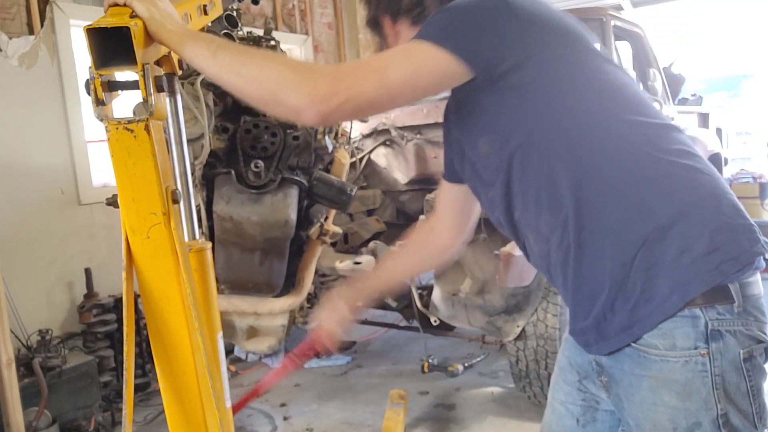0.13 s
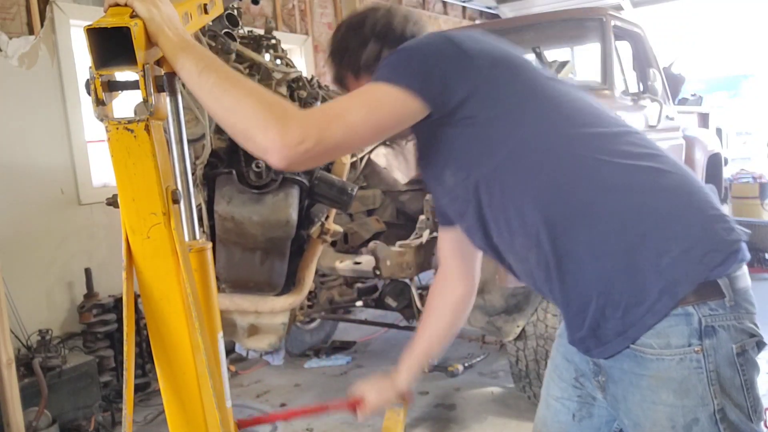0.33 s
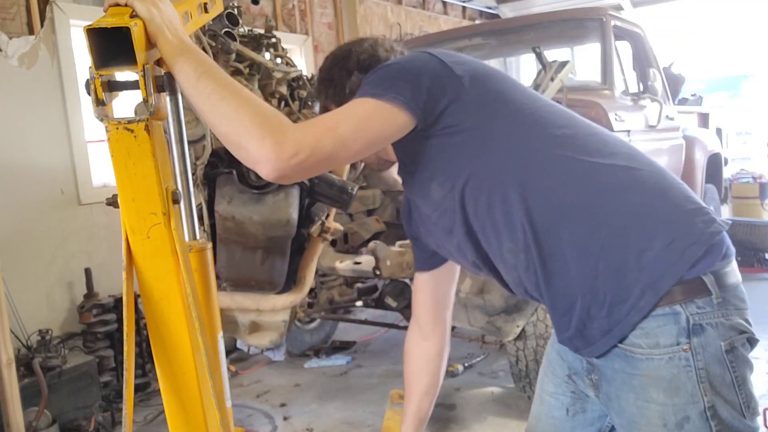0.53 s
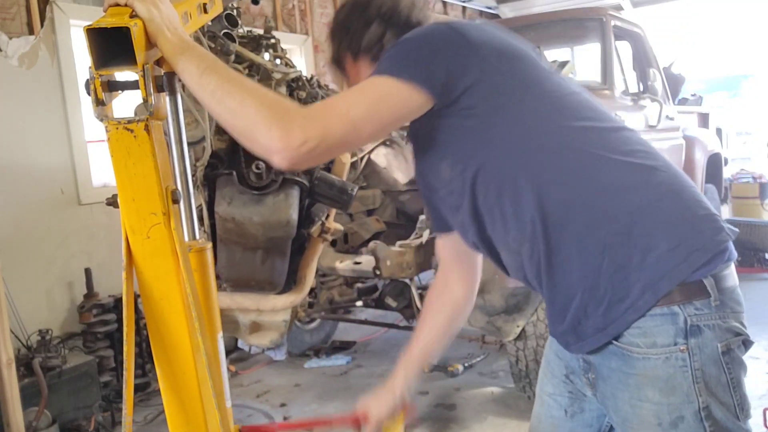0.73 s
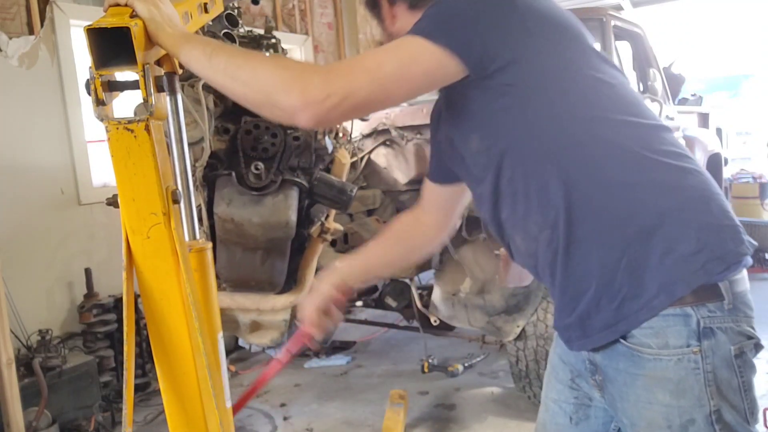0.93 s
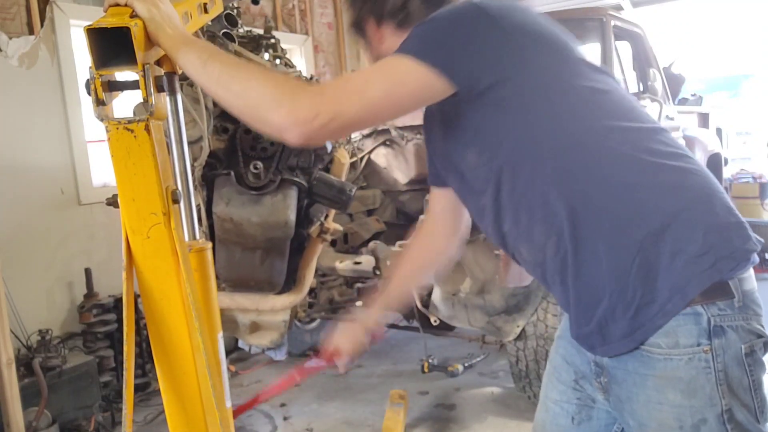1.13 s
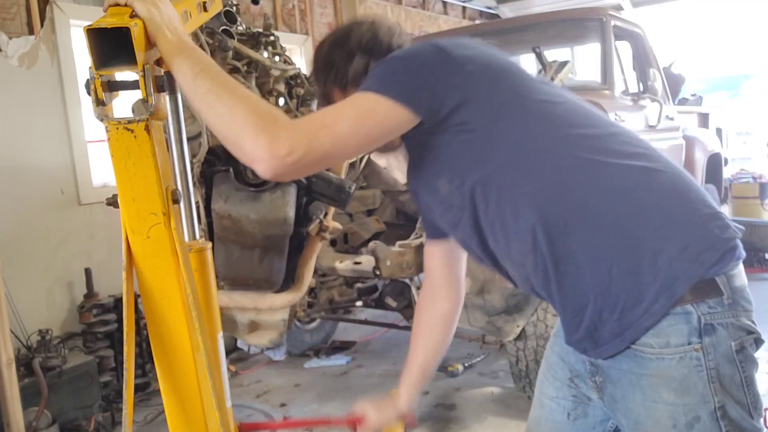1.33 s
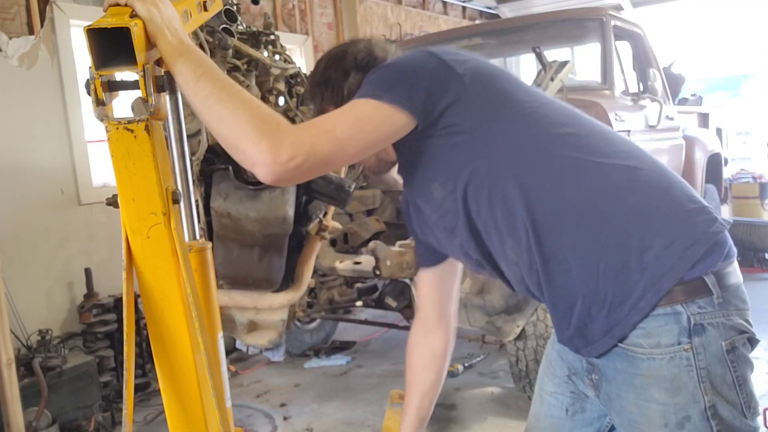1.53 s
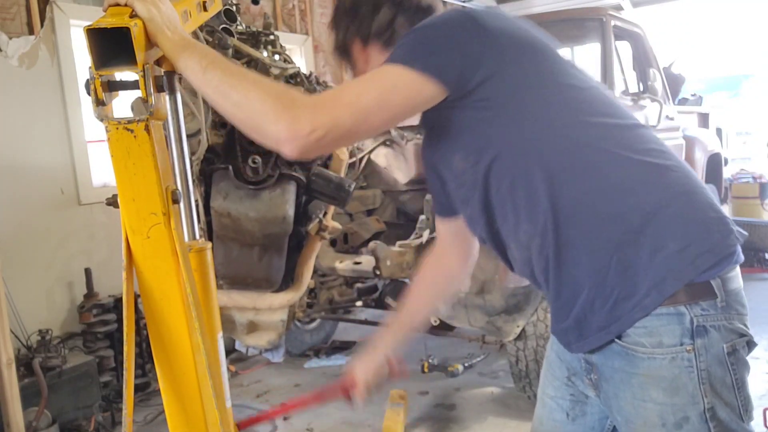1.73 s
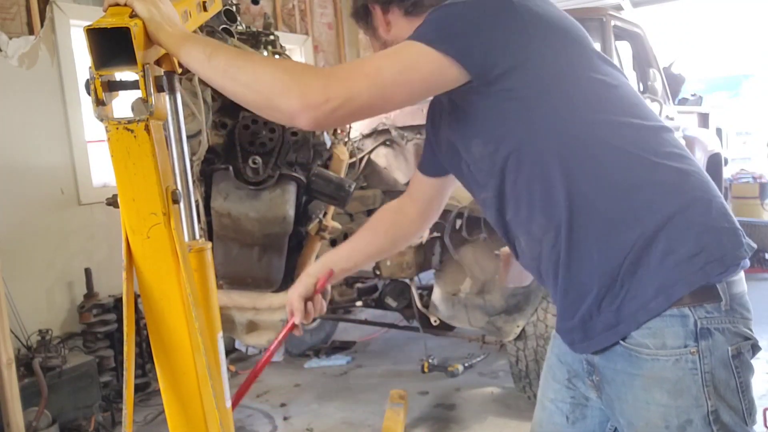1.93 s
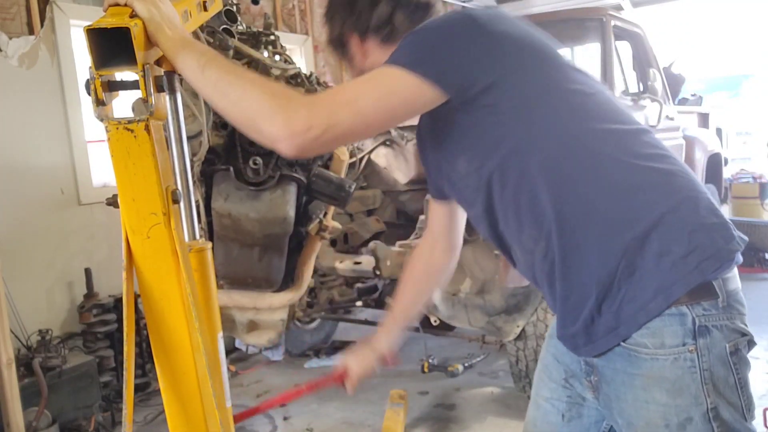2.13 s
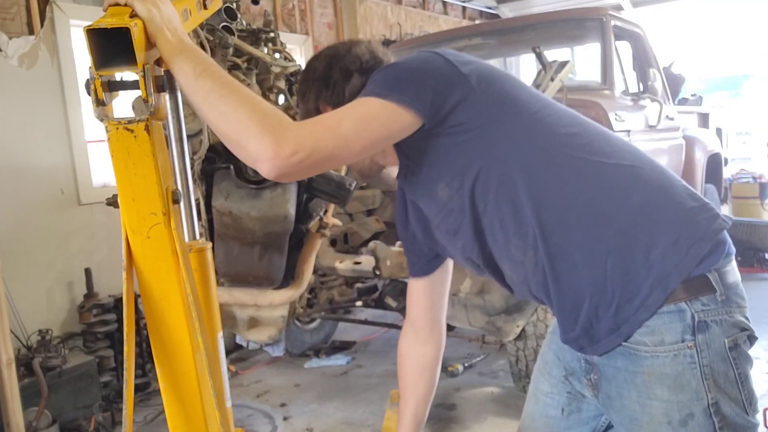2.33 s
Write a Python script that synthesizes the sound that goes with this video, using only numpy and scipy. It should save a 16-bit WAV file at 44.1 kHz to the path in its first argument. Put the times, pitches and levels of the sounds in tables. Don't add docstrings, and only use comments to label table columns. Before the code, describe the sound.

A steel hydraulic hoist clanks and rattles sharply on three hand-pumped strokes in a garage

```python
import sys
import numpy as np
from scipy import signal
from scipy.fft import rfft, irfft
from scipy.io import wavfile
from scipy.ndimage import uniform_filter1d

SR = 44100
rng = np.random.default_rng(int(sys.argv[2]) if len(sys.argv) > 2 else 0)


def int16_out(signal):
    q = np.round(np.clip(np.atleast_2d(signal).T, -1, 1) * 32767)
    wavfile.write(sys.argv[1], SR, q.astype(np.int16))


def gain_from_db(level_db):
    decades = np.asarray(level_db, float) / 20
    return 10 ** decades


N = 110250
T = np.arange(N) / SR

CHATTER_START_S = [.203, .2245, 1.125, 1.138, 1.162, 1.177, 2.075, 2.100, 2.117]
CHATTER_SWELL_DB = [0, 0, -3.5, 20, -5, -2, 21.5, 7, 0]
# length in seconds, drive of frame, cylinder, pins and spring in dB.
CHATTER = [
    (0.027, -45, -37, -42, -43),
    (0.035, -46.5, -32, -41.5, -48.5),
    (.02, -65.5, -87.5, -100, -97.5),
    (0.02, -49, -56.5, -51.5, -60),
    (0.013, -46, -49.5, -47, -45),
    (0.0302, -40.5, -48, -50.5, -55.5),
    (0.027, -50, -59, -62, -60),
    (0.0161, -41, -47, -51, -46.5),
    (0.035, -42, -35.5, -40.5, -49.5),
]
# peak in seconds, rise in seconds, fall in seconds, frame level in dB, seal level in dB.
RUBS = [
    (0.055, 0.0053, 0.034, -69, -62.5),
    (0.123, 0.0059, 0.015, -74, -61),
    (0.186, 0.011, 0.049, -87, -59.5),
    (0.682, 0.029, 0.015, -63, -78.5),
    (0.728, 0.022, 0.022, -64.5, -65),
    (0.799, 0.013, 0.026, -79.5, -78),
    (1.5, 0.024, 0.03, -71.5, -75),
    (1.629, 0.023, 0.02, -58.5, -70),
    (1.727, 0.03, 0.016, -62.5, -56.5),
    (1.808, 0.039, 0.034, -66, -67),
]
# frequency in Hz, level in dB, T60 in seconds.
FRAME_MODES = [(340, -1, .05), (385, -2, .06), (510, -8, .05), (700, -7, .06), (785, -7, .07),
               (1022, 0, .05), (1066, -1, .06)]
CYLINDER_MODES = [(1380, -8, .04), (1750, -2, .04), (1850, -3, .04), (1960, -8, .04), (2290, -5, .04),
                  (2550, 0, .04), (2680, -2, .03), (2860, -1, .03), (3350, -6, .04)]
PIN_MODES = [(4460, -1, .02), (5930, -3, .02), (6720, 0, .015), (7400, -4, .015)]
SEAL_MODES = [(1050, -8, .03), (2550, -2, .04), (3520, -5, .025), (4900, -10, .01), (8100, -9, .01),
              (10800, -14, .008), (12400, -16, .008), (13800, -14, .008)]
# frequency in Hz, density in dB per Hz.
FRAME_FIZZ = [(120, -45), (270, -26), (340, 0), (1000, 0), (1700, -5), (2300, -14), (5000, -30)]
CYLINDER_FIZZ = [(600, -30), (1350, -14), (1750, -2), (2600, 0), (3200, -6), (4000, -13), (9000, -30)]
PIN_FIZZ = [(1500, -21.5), (3500, -5.5), (4500, -1), (5500, -9), (7000, -1.5), (8000, -7.5), (10000, -27)]
SEAL_FIZZ = [(500, -2.5), (2000, 4.5), (3400, -1.5), (4000, 0.5), (7000, -6), (10000, -8.5), (16000, -17.5)]
SPRING_FIZZ = [(6000, -25.5), (8500, 1), (10000, -7), (11500, -3.5), (13700, -2), (16000, -3)]
# start in seconds, boom, ram and collar levels in dB.
BLOWS = [
    (.226, -28, -0.5, -8),
    (1.165, -14, -5, -27),
    (2.118, -9.5, -1, -6),
]
# frequency in Hz, level in dB, T60 in seconds.
BOOM_MODES = [(125, -20, .35), (165, -18, .35), (235, -14, .3), (330, 0, .25), (388, 0, .3),
              (508, -10, .15), (840, -5, .18), (895, -7, .25), (1093, -7, .2)]
RAM_MODES = [(1583, -8, .58), (1678, -2, .42), (1747, -3, .27), (1846, -6, .5)]
COLLAR_MODES = [(2290, -5, .33), (2549, 2, .46), (2686, -5, .32), (2740, -9, .2), (2866, -5, .18),
                (3365, -7, .38)]
# start in seconds, hold in seconds, frequency in Hz. Then their levels in dB.
SINGING = [(.212, .05, 340), (.225, .04, 385), (.228, .035, 1022), (.228, .035, 1066), (.215, .025, 1850),
           (.232, .03, 1750), (.228, .03, 2550), (.24, .025, 2690), (1.17, .045, 335), (1.17, .04, 385),
           (1.18, .04, 840), (1.165, .05, 1022), (1.17, .045, 1066), (1.136, .02, 13750),
           (1.163, .008, 13750), (2.112, .045, 340), (2.115, .045, 385), (2.115, .04, 710),
           (2.12, .04, 1022), (2.12, .04, 1066), (2.118, .03, 2570), (2.135, .025, 2830), (2.13, .03, 1680),
           (1.71, .04, 2550), (1.72, .03, 1060), (1.72, .03, 510)]
SINGING_DB = [-47.5, -46, -40.5, -43, -31.5, -28, -36, -36, -44, -41.5, -39.5, -41, -38.5, -52, -42, -40.5,
              -40, -43, -40, -36.5, -34, -47, -31, -61.5, -54, -61]
# start in seconds, level in dB, centre in Hz, width in Hz, T60 in seconds.
TICKS = [(0.1978, -33, 12000, 5000, .02), (.204, -19, 11340, 1500, 0.026), (0.2115, -19, 14600, 2000, .012),
         (.2118, -23, 11700, 1500, .02), (0.2245, -15, 1820, 1200, 0.033), (.2254, -9.5, 6600, 3500, 0.017),
         (0.2338, -7.5, 2980, 3030, 0.009), (.2335, -20.5, 7100, 2020, 0.011),
         (0.2435, -11, 2200, 2504, 0.014), (0.2532, -17, 2770, 1491, .015), (0.2603, -16, 2850, 1500, .015),
         (1.003, -48.5, 700, 895, .04), (.628, -54, 705.5, 695, 0.042), (1.143, -43, 6275, 1000, 0.038),
         (1.1626, -23.5, 6300, 1470, .015), (1.174, -20.5, 4670, 594, 0.035),
         (1.178, -13.5, 1030, 1200, 0.025), (1.187, -16.5, 1220, 2000, 0.0056),
         (1.2065, -20, 982, 1500, .015), (1.612, -54, 15000, 2020, 0.045), (1.703, -47, 9000, 8000, 0.031),
         (0.714, -45, 9170, 7090, 0.026), (2.102, -35.5, 1473, 2540, 0.034),
         (2.1058, -29, 14100, 1500, 0.022), (2.1169, -17, 7270, 2000, .015),
         (2.1192, -13.5, 7000, 3040, 0.017), (2.119, -22, 11100, 1200, .025),
         (2.1228, -9.5, 3500, 4860, 0.0054), (2.1275, -36, 11050, 1200, 0.018),
         (2.127, -15.5, 6140, 5030, 0.0071), (2.1346, -7.5, 2700, 1490, 0.013),
         (2.152, -32, 4930, 5000, .01)]
# middle in
# seconds, length in seconds, level in dB, centre in Hz, width in Hz.
SQUIRTS = [(0.07, 0.015, -57.5, 5250, 3100), (0.072, .012, -61, 16000, 1100),
           (0.716, 0.0035, -54.5, 6880, 690), (0.729, 0.01, -51, 12600, 3960),
           (.723, .003, -46, 28000, 900), (.733, 0.0046, -46, 13200, 900), (.737, 0.0025, -48, 8900, 1201),
           (1.024, 0.014, -55.5, 447, 230), (0.58, 0.007, -55, 320, 110), (1.043, 0.02, -68, 960, 1650),
           (1.73, 0.016, -52.5, 13200, 2000), (1.735, 0.014, -57, 6200, 600),
           (1.81, 0.0063, -61, 8050, 700)]
# frequency in Hz, level in dB.
SQUEAK = [(4238, 0.5), (4340, 0.04)]
# frequency in Hz, T60 in seconds.
ROOM_T60 = [(100, 0.81), (400, 0.37), (1500, 0.34), (5000, 0.39), (14000, 0.19)]
# frequency in Hz, gain in dB.
LEFT_SHADE = [(300, 0), (1000, -2), (4000, -2), (8000, -6), (14000, -12)]
# frequency in Hz, level in dB rms.
HUM = [(59.5, -64), (119, -75)]
# frequency in Hz, gain in dB.
AIR = [(25, -26.5), (50, 3), (75, 3), (100, -14.5), (370, -8.5), (700, -19), (1200, -25.5), (4000, -44)]

CHATTER_PER_S, CHATTER_SPREAD_DB = 5000, 2.5
RUB_PER_S, RUB_SPREAD_DB = 9000, 2.2
BLOW_RISE_S, BLOW_ROOM_DB = 0.022, -7
ROCK_HZ, ROCK_DB, ROCK_RISE_S, ROCK_T60_S = 67, -43, 0.038, 0.26
SING_RISE_S, SING_T60_S, SING_FLUTTER_DB = 0.0037, 0.082, 4
SQUEAK_DB, SQUEAK_END_S = -51.5, 0.047
CASE_HZ = 158
ROOM_DB, ROOM_ONSET_S, SHARED_BASS_HZ = -1, 0.00075, 350
LEFT_LAG_S = 0.00016
AIR_DB, HISS_DB = -64.5, -90
LOW_HZ, TOP_HZ = 40, 16100


def curve(points, hz):
    p = np.array(points, float)
    return np.interp(np.log(hz + 1), np.log(p[:, 0]), p[:, 1])


def colour(x, points, lag_s=0.):
    hz = np.fft.rfftfreq(x.shape[-1], 1 / SR)
    response = gain_from_db(curve(points, hz)) * np.exp(-2j * np.pi * hz * lag_s)
    return irfft(rfft(x) * response, x.shape[-1])


def peak(hz, width_hz):
    edge = 1 + width_hz / hz
    return [(hz / edge ** 3, -70), (hz / edge, -20), (hz, 0), (hz * edge, -20), (hz * edge ** 2, -70)]


def unit(x):
    return x / np.sqrt(np.sum(x ** 2))


def flutter(rate_hz):
    x = uniform_filter1d(rng.standard_normal(N), SR // rate_hz)
    return x / x.std()


def modes(table):
    t = T[:SR]
    out = 0
    for hz, db, t60 in table:
        out = out + gain_from_db(db - 60 * t / t60) * np.sin(2 * np.pi * hz * t) / np.sqrt(t60)
    return out


def ring(x, response):
    return signal.fftconvolve(x, response)[:N]


def clicks(rate, spread_db):
    size = np.minimum(rng.exponential(size=N), 4)
    hit = rng.random(N) < rate / SR
    x = hit * rng.choice([-1, 1], N) * gain_from_db(spread_db * size)
    return x / x.std()


def part(force, table, fizz, fizz_db):
    hz = np.fft.rfftfreq(N, 1 / SR)
    gain = np.sqrt(np.mean(gain_from_db(2 * curve(fizz, hz))))
    return ring(force, unit(modes(table))) + gain_from_db(fizz_db) * colour(force, fizz) / gain


def linkage():
    force = np.zeros((4, N))
    for s, swell_db, (length, *db) in zip(CHATTER_START_S, CHATTER_SWELL_DB, CHATTER):
        swell = gain_from_db(swell_db * (np.clip((T - s) / length, 0, 1) - 1))
        attack = np.clip((T - s) / 0.001, 0, 1)
        release = np.clip((s + length - T) / 0.003 + 1, 0, 1)
        force += np.outer(gain_from_db(db), swell * attack * release)
    rub = np.zeros((2, N))
    for s, rise, fall, *db in RUBS:
        rub += np.outer(gain_from_db(db), np.exp(-0.5 * ((T - s) / np.where(T < s, rise, fall)) ** 2))
    chatter = clicks(CHATTER_PER_S, CHATTER_SPREAD_DB)
    grit = clicks(RUB_PER_S, RUB_SPREAD_DB)
    frame = part(force[0] * chatter + rub[0] * grit, FRAME_MODES, FRAME_FIZZ, fizz_db=-0.5)
    cylinder = part(force[1] * chatter, CYLINDER_MODES, CYLINDER_FIZZ, fizz_db=5.0)
    pins = part(force[2] * chatter, PIN_MODES, PIN_FIZZ, fizz_db=7.5)
    seal = part(rub[1] * grit, SEAL_MODES, SEAL_FIZZ, fizz_db=6.5)
    spring = part(force[3] * chatter, SEAL_MODES[-3:], SPRING_FIZZ, fizz_db=7)
    return frame + cylinder + pins + seal + spring


def blows():
    t = T[:SR]
    out = np.zeros(N + SR)
    rise = 1 - np.exp(-t / BLOW_RISE_S)
    rock_rise = 1 - np.exp(-(t / ROCK_RISE_S) ** 2)
    rock = gain_from_db(ROCK_DB) * rock_rise * modes([(ROCK_HZ, 0, ROCK_T60_S)])
    for s, *levels_db in BLOWS:
        rung = 0
        for db, table in zip(levels_db, (BOOM_MODES, RAM_MODES, COLLAR_MODES)):
            rung = rung + gain_from_db(db + 9.5) * unit(modes(table))
        out[int(s * SR):][:SR] += rock + rise * rung
    return out[:N]


def singing():
    out = 0
    for (s, held, hz), db in zip(SINGING, SINGING_DB):
        fade_db = -60 * np.maximum(T - s - held, 0) / SING_T60_S + SING_FLUTTER_DB * flutter(100)
        rise = np.clip((T - s) / SING_RISE_S, 0, 1)
        out = out + gain_from_db(db + fade_db) * rise * np.sin(2 * np.pi * hz * T)
    return out


def ticks():
    t = T[:SR]
    out = np.zeros(N + SR)
    for s, db, hz, width_hz, t60 in TICKS:
        wash = unit(colour(rng.standard_normal(SR), peak(hz, width_hz)) * gain_from_db(-60 * t / t60))
        attack = np.clip(t * hz, 0, 1)
        out[int(s * SR):][:SR] += gain_from_db(db + 12.5) * wash * attack
    return out[:N]


def squirts():
    out = 0
    for s, length, db, hz, width_hz in SQUIRTS:
        hiss = colour(rng.standard_normal(N), peak(hz, width_hz))
        out = out + gain_from_db(db) * hiss / hiss.std() * np.exp(-0.5 * ((T - s) / length) ** 2)
    return out


def squeak():
    tone = sum(gain_from_db(db) * np.sin(2 * np.pi * hz * T) for hz, db in SQUEAK)
    fade = np.clip((SQUEAK_END_S - T) / 0.01, 0, 1)
    return gain_from_db(SQUEAK_DB + 2.0 * flutter(150)) * tone * fade


def pair(size):
    mid, side = rng.standard_normal((2, size))
    side = signal.lfilter(*signal.butter(1, SHARED_BASS_HZ, "high", fs=SR), side)
    return np.array([mid + side, mid - side])


def garage(x):
    t, noise, tail = T[:SR], pair(SR), 0
    for hz in 62.5 * 2. ** np.arange(9):
        octave = [(hz / 2, -40), (hz / 1.42, -3), (hz, 0), (hz * 1.41, -3), (hz * 2, -40)]
        tail = tail + colour(noise, octave) * gain_from_db(-60 * t / curve(ROOM_T60, hz))
    tail = tail * (1 - np.exp(-t / ROOM_ONSET_S))
    return gain_from_db(ROOM_DB) * np.array([ring(x, unit(h)) for h in tail])


def background():
    waver_db = 1.0 * flutter(14)
    hum = sum(np.sqrt(2) * gain_from_db(db + waver_db) * np.sin(2 * np.pi * hz * T) for hz, db in HUM)
    air = colour(pair(N), AIR)
    return hum + gain_from_db(AIR_DB) * air / air.std() + gain_from_db(HISS_DB) * rng.standard_normal((2, N))


def scene():
    rattle = linkage() + ticks() + squirts() + squeak()
    rung = blows() + singing()
    rattle = signal.sosfilt(signal.butter(2, CASE_HZ, "high", fs=SR, output="sos"), rattle)
    right = rattle + rung
    left = colour(right, LEFT_SHADE, LEFT_LAG_S)
    room = garage(rattle + gain_from_db(BLOW_ROOM_DB) * rung)
    return np.array([left, right]) + room + background()


def top_cut(x):
    return signal.sosfilt(signal.butter(12, 16950, fs=SR, output="sos"), x)


def record(dry):
    mix = signal.sosfilt(signal.butter(2, LOW_HZ, "high", fs=SR, output="sos"), dry)
    mix = signal.sosfilt(signal.ellip(8, 0.2, 70, TOP_HZ, fs=SR, output="sos"), mix)
    return top_cut(mix)


dry = scene()
out = record(dry)
int16_out(out)
```